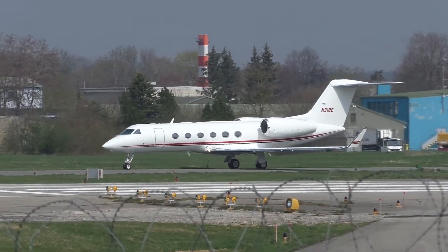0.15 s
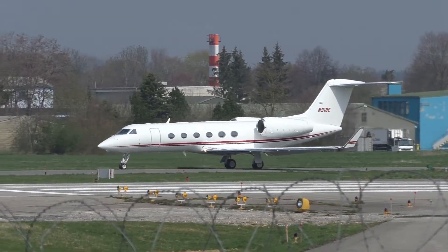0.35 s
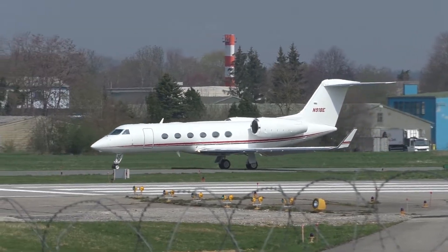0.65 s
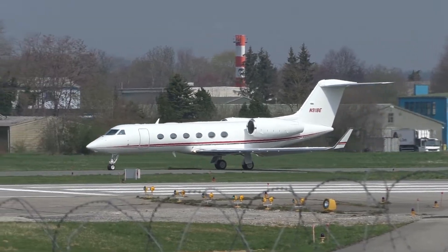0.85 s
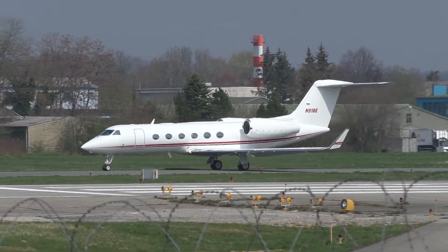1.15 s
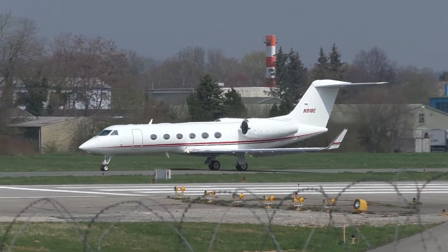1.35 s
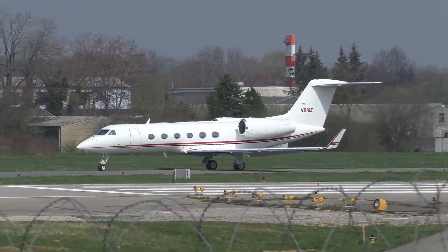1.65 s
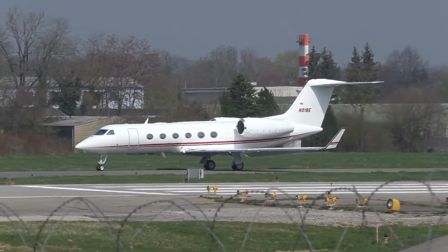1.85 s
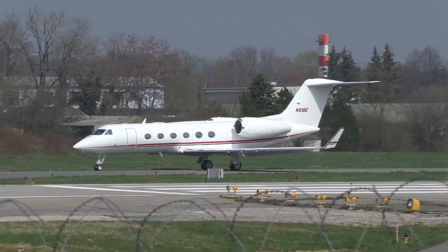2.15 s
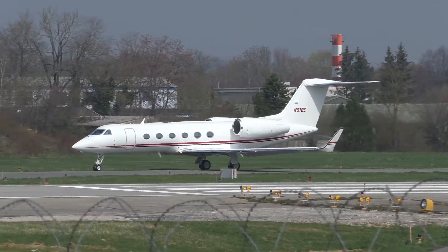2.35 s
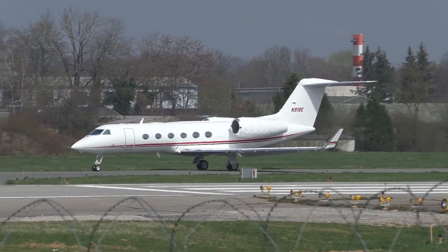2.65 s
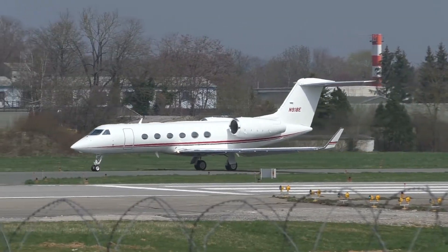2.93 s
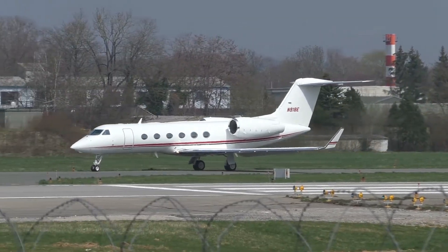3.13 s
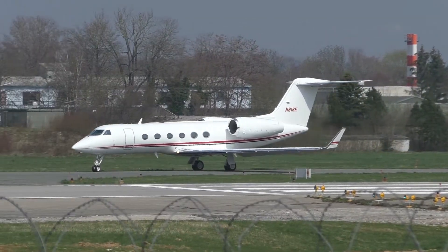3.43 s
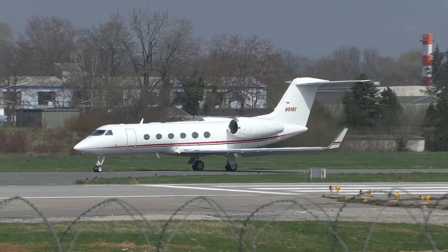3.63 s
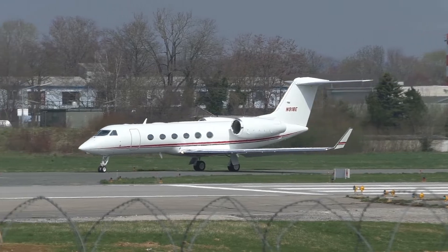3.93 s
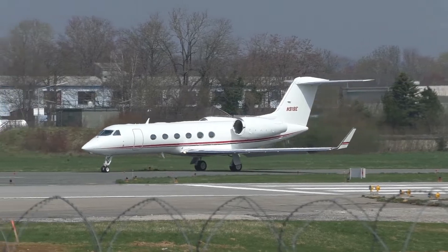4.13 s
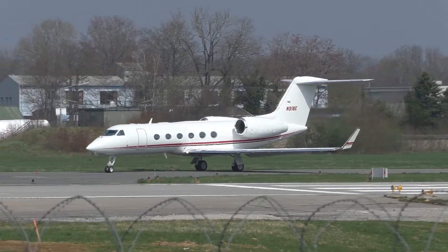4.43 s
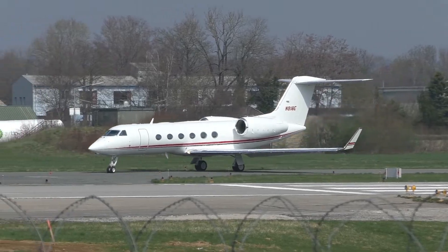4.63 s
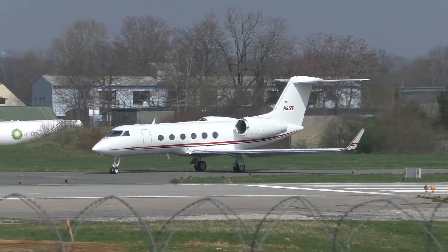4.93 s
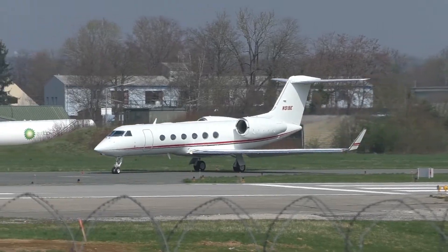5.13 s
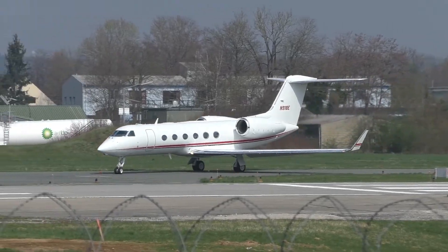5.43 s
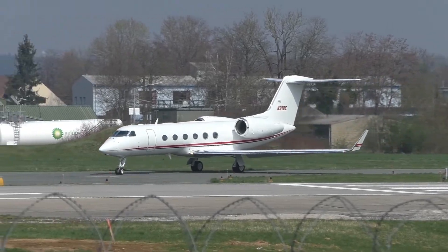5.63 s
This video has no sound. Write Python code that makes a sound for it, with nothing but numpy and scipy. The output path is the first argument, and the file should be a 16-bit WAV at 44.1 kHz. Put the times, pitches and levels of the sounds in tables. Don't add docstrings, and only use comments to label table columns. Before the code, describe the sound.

A distant twin-engine jet taxis by with a wavering whine over a dull roar, while wind thumps the microphone and a camera clicks three times.

```python
import sys
import numpy as np
from scipy import signal
from scipy.fft import rfft, irfft, next_fast_len
from scipy.io import wavfile
from scipy.ndimage import uniform_filter1d

SR = 44100
rng = np.random.default_rng(int(sys.argv[2]) if len(sys.argv) > 2 else 0)


def invert_db(level):
    return 10 ** (np.asarray(level, dtype=float) / 20)


def wav_record(signal):
    frames = np.transpose(np.atleast_2d(signal))
    bounded = np.clip(frames, -1, 1)
    quanta = np.round(bounded * 32767).astype(np.int16)
    wavfile.write(sys.argv[1], SR, quanta)


N = 255339
HOP = 40
LEFT_DB = -7.5


def control_time():
    return np.arange(N // HOP + 2) * HOP / SR


def spread(control):
    return np.interp(np.arange(N) / HOP, np.arange(len(control)), control)


def in_time(rows):
    s, *columns = np.transpose(rows)
    return [np.interp(control_time(), s, column) for column in columns]


def bells(s, half_s):
    centre_s, half_s = np.reshape(s, (-1, 1)), np.reshape(half_s, (-1, 1))
    return np.exp(-((control_time() - centre_s) / half_s) ** 2)


def rms_one(x):
    return x / np.sqrt(np.mean(x ** 2) + 1e-20)


def drift(rate_hz):
    r = np.exp(-2 * np.pi * rate_hz * HOP / SR)
    settle = 2000
    noise = rng.standard_normal(N // HOP + 2 + settle)
    return rms_one(signal.lfilter([1], [1, -2 * r, r * r], noise)[settle:])


def at_hz(points, hz):
    points = np.array(points)
    return np.interp(np.log(hz), np.log(points[:, 0]), points[:, 1])


def coloured(points, x=None):
    size = next_fast_len(N)
    hz = np.maximum(np.arange(size // 2 + 1) * SR / size, 0.1)
    x = rng.standard_normal(N) if x is None else x
    return rms_one(irfft(rfft(x, size) * invert_db(at_hz(points, hz)), size)[:N])


def resonance(x, hz, width_hz):
    r = np.exp(-np.pi * width_hz / SR)
    numerator = np.array([1, 0, -1]) * (1 - r * r) / 2
    return signal.lfilter(numerator, [1, -2 * r * np.cos(2 * np.pi * hz / SR), r * r], x)


def focus(hz, rows, half_s, octaves):
    s, centre_hz, gain_db = np.transpose(rows)[:3]
    nearness = np.exp(-(np.log2(hz / centre_hz) / octaves) ** 2)
    return gain_db * nearness @ bells(s, half_s)


def swell_db_at(hz):
    # t/s, f/Hz, gain/dB, half-length/s
    swells = [(0.091, 868, -4, 0.34), (0.097, 2580, -3.5, .15), (0.752, 2480, 5, 0.19),
              (1.53, 2500, 8, 0.078), (1.991, 1100, 1, 0.28), (2.6, 1800, -8, 0.16),
              (2.904, 395, 2.5, 0.064), (3.023, 1705, 5, 0.18), (3.029, 4540, 4.5, 0.079),
              (3.093, 91.3, 5.5, .25), (3.392, 1476, 2, 0.14), (4.003, 878, 2.5, 0.24),
              (3.85, 6030, -4, 0.34), (0.852, 3200, 2.5, .3), (2.4, 2500, -1.5, .08), (5.1, 331, 4, 0.36),
              (4.342, 1464, 2.5, 0.17), (5.325, 914, 4.5, 0.16), (5.476, 2006, 3, 0.058),
              (5.773, 300, 6.5, 0.025), (5.764, 3020, 6.5, 0.055)]
    return focus(hz, swells, np.array(swells)[:, 3], octaves=1)


def level_at(hz):
    # f/Hz, start level/dB, rise/(dB/s)
    roar_turn = np.array([(357, -45, -0.28), (1100, -41.5, 2), (2900, -37.5, 0.16), (4300, -55.5, 1.75)])
    # t/s, f/Hz, gain/dB, half-length/s
    patches = [(0.421, 1450, 4.5, .2), (0.452, 2600, 3, 0.12), (0.757, 520, 2.5, .1),
               (0.718, 3100, 4.5, 0.18), (.97, 3100, 4.5, 0.18), (0.965, 1050, 5.5, 0.21),
               (.95, 4300, 6, .1), (1.186, 1800, -3, .1), (1.346, 2900, 4, 0.14), (1.805, 4000, 8.5, 0.14),
               (1.938, 1350, 6, 0.18), (1.997, 2900, 3, 0.11), (2.307, 800, 2, 0.16),
               (2.25, 2300, -3.5, .12), (2.846, 2900, -4.5, 0.17), (3.154, 1000, 3.5, 0.19),
               (3.349, 3500, 6, .13), (3.65, 2700, -3, 0.17), (3.954, 3800, 1.5, .2), (4.05, 2000, 4.5, .2),
               (4.045, 700, 5, .1), (4.342, 2100, -0.5, 0.093), (4.459, 1450, 1, 0.11),
               (4.642, 2900, -2, 0.091), (4.802, 1000, 2, .12), (4.85, 700, 8, 0.13),
               (5.003, 4300, 5.5, 0.17), (5.2, 3000, 10, 0.29), (5.294, 700, 6, 0.15),
               (5.295, 500, 3.5, 0.19)]
    trend_db = at_hz(roar_turn[:, :2], hz) + at_hz(roar_turn[:, ::2], hz) * control_time()
    return trend_db + swell_db_at(hz) + focus(hz, patches, np.array(patches)[:, 3], octaves=0.27)


def roar(patchy_db):
    # f/Hz, density/dB
    roar_colour = [(70, -29.5), (115, -2.5), (210, -11), (420, -14), (700, -9.5), (1200, -8), (1900, -14.5),
                   (2600, -18.5), (3200, -18.5), (4200, -26.5), (5500, -37.5), (7000, -48.5), (8500, -54.5),
                   (12000, -62.5)]
    # f/Hz, width/Hz
    duct_peak = (722.5, 58)
    edges_hz = 80 * 2 ** np.arange(0, 7.7, 1 / 3)
    white = rng.standard_normal((2, N))
    jet = 0
    for k, (low, high) in enumerate(zip(edges_hz, edges_hz[1:])):
        band_filter = signal.butter(2, [low, high], "band", fs=SR, output="sos")
        band = signal.sosfilt(band_filter, white[k % 2])
        swell_db = level_at(np.clip(np.sqrt(low * high), 200, 6500))
        own_db = patchy_db * (drift(2.77) + 0.5 * drift(5.8))
        jet = jet + band * spread(invert_db(swell_db - swell_db.mean() + own_db))
    howl = resonance(rng.standard_normal(N), *duct_peak)
    howl = rms_one(resonance(howl, *duct_peak))
    return invert_db(-33) * coloured(roar_colour, jet) + howl * spread(invert_db(level_at(duct_peak[0]) - 5.5))


def tone(hz, level_db, flicker_db, wander):
    phase = 2 * np.pi * (np.cumsum(hz) * HOP / SR + rng.random())
    phase = phase + wander * (drift(5.7) + 0.44 * drift(46))
    level = invert_db(level_db + flicker_db * drift(14.2))
    return np.sqrt(2) * spread(level) * np.sin(spread(phase))


def whine():
    # t/s, fan blade f/Hz, compressor base f/Hz
    spool_speed = [(0.0, 2069.9, 726.7), (0.4, 2068.6, 726.7), (0.8, 2069.4, 728.0), (1.2, 2070.1, 727.6),
                   (1.6, 2066.9, 725.0), (2.0, 2061.3, 722.7), (2.4, 2059.0, 722.1), (2.8, 2062.0, 722.3),
                   (3.2, 2064.2, 722.6), (3.6, 2058.9, 721.6), (4.0, 2051.4, 720.6), (4.4, 2048.4, 720.4),
                   (4.8, 2050.2, 721.7), (5.2, 2052.2, 722.1), (5.6, 2051.7, 721.9), (5.8, 2051.4, 721.7)]
    # t/s, level/dB
    blade_level = [(0, -54.5), (.4, -40), (.62, -45.5), (.85, -37), (1.05, -47.5), (1.6, -32.5),
                   (1.87, -44.5), (2.1, -39), (2.38, -56), (2.6, -44), (2.92, -50.5), (3.05, -33.5),
                   (3.5, -41.5), (4.0, -28.5), (4.52, -38.5), (4.82, -32), (5.25, -48), (5.79, -28)]
    fan_orders = [1, 1.0475, 1.142, 1.571]
    # start level/dB, rise/(dB/s)
    sum_tones = [(-53, 0.54), (-59.5, 1.5), (-54.5, 0.9)]
    # start level/dB, rise/(dB/s)
    core_orders = [(-69.5, 1.7), (-66.5, 1.2), (-73, 1.6)]
    # t/s, f/Hz, gain/dB
    fan_flares = [(.75, 2166, 15.5), (1.25, 2166, 10), (1.42, 2166, 9), (1.6, 2166, 11), (1.88, 2160, 7.5),
                  (3.1, 2160, 4.5), (4.0, 2150, 12.5), (4.33, 2146, 21), (4.92, 2148, 9), (5.15, 2150, 3),
                  (.45, 2362, 10), (.72, 2362, 7), (1.55, 2360, 7), (1.9, 2355, 6.5), (3.03, 2355, 9),
                  (4.0, 2343, 11.5), (4.55, 2340, 9.5), (4.8, 2340, 8), (5.45, 2343, 7), (5.72, 2343, 10.5),
                  (0.721, 3250, 13.5), (1.0, 3250, 10), (1.55, 3245, 6.5), (2.1, 3240, 5.5),
                  (3.38, 3240, 10.5), (3.75, 3230, 5.5), (4.5, 3220, 2.5), (5.18, 3224, 12.5),
                  (5.35, 3224, 5), (5.75, 3224, 9.5)]
    # t/s, f/Hz, gain/dB
    core_flares = [(.5, 4360, 4), (.68, 4365, 7), (1.54, 4350, 6), (1.78, 4345, 11), (1.98, 4335, 5),
                   (2.97, 4333, 9), (3.35, 4333, 7), (4.42, 4322, 8), (4.76, 4328, 4), (.22, 5087, 3),
                   (.66, 5117, 10.5), (1.63, 5070, 10), (2.0, 5060, 6), (3.38, 5055, 8), (3.94, 5070, 9),
                   (4.38, 5043, 9), (4.75, 5090, 6.5), (5.0, 5054, 8.5), (5.5, 5054, 10.5), (.66, 5830, 8),
                   (.99, 5830, 7), (1.55, 5800, 13), (1.75, 5795, 6.5), (3.0, 5780, 8), (3.18, 5780, 8),
                   (3.38, 5778, 11), (4.29, 5780, 11.5), (4.65, 5806, 12), (4.98, 5775, 13),
                   (5.45, 5775, 7)]
    weak_orders = [.1228, .246, 1.2225, 1.3615, 1.492, 1.540, 1.921, 2]
    weak_db = [-14, -27.5, -29, -26, -19, -26.5, -17.5, -24]
    # multiple, level against the roar/dB
    core_weak = [(2, -25), (9, -30.5)]

    t = control_time()
    fan_hz, core_hz = (uniform_filter1d(hz, size=SR // 160) for hz in in_time(spool_speed))
    hum_hz = 92.3
    hum_db = -34 - 0.5 * t + swell_db_at(hum_hz)
    out = tone(np.full(len(t), hum_hz), hum_db, flicker_db=1.36, wander=0.27)
    out += tone(fan_hz, in_time(blade_level)[0], flicker_db=1.5, wander=0.53)

    for multiple, (start_db, rise) in zip(fan_orders[1:], sum_tones):
        hz = multiple * fan_hz
        level_db = start_db + rise * t + focus(hz.mean(), fan_flares, half_s=0.13, octaves=0.017)
        out += tone(hz, level_db, flicker_db=2.0, wander=0.59)

    for order, (start_db, rise) in enumerate(core_orders, start=6):
        hz = order * core_hz
        flare_db = focus(hz.mean(), core_flares, half_s=0.1, octaves=0.017)
        level_db = start_db + rise * t + flare_db + 1.6 * drift(7.7)
        out += tone(hz, level_db, flicker_db=2.2, wander=0.48)
        out += tone(hz * 1.0006, level_db - 4.0, flicker_db=2.5, wander=0.67)

    weak = [(multiple * fan_hz, db) for multiple, db in zip(weak_orders, weak_db)]
    weak += [(multiple * core_hz, db) for multiple, db in core_weak]
    for hz, over_db in weak:
        level_db = level_at(hz.mean()) + over_db + 3.9 * drift(0.8)
        out += tone(hz, level_db, flicker_db=4.5, wander=0.7)
    return out


def wind():
    # t/s, thump level/dB, buffet level/dB, half-length/s
    gusts = [(0.007, -28, -21, 0.032), (0.13, -11, -25.5, 0.077), (.25, -15, -23, 0.1),
             (0.463, -15, -24, .08), (0.831, -12, -21.5, 0.15), (1.007, -14, -17.5, 0.05),
             (1.153, -13.5, -18.5, 0.04), (1.3, -12, -27, .06), (1.562, -15, -26, 0.15),
             (2.042, -10, -22, 0.07), (2.195, -13, -22, 0.1), (2.397, -11, -17.5, 0.1),
             (2.6, -15, -23, 0.081), (3.212, -21, -25, 0.1), (3.508, -6.5, -23, .1),
             (3.648, -9.5, -22, 0.052), (3.918, -22, -21.5, .06), (4.081, -20, -20.5, .05),
             (4.195, -12, -30, 0.12), (4.372, -16.5, -20.5, 0.044), (4.541, -12, -33, .06),
             (4.99, -19, -29, .04), (5.405, -12, -18.5, 0.049), (5.63, -10, -36, 0.17)]
    # thump level/dB, buffet level/dB
    lulls_db = (-21, -28)
    # f/Hz, density/dB
    thump_colour = [(2, -0.5), (5, 16), (12, 17), (20, 9.5), (28, -1.5), (45, -52.5), (400, -160)]
    # f/Hz, density/dB
    buffet_colour = [(15, -14), (26, 3.5), (45, -8.5), (70, -12), (120, -21), (180, -42.5), (300, -75.5),
                     (2000, -150)]
    s, *gust_db, half_s = np.transpose(gusts)
    out = 0
    for level_db, lull_db, colour in zip(gust_db, lulls_db, (thump_colour, buffet_colour)):
        air = coloured(colour)
        gust_power = invert_db(level_db) ** 2 @ bells(s, half_s) ** 2
        strength = spread(np.sqrt(gust_power + invert_db(lull_db) ** 2))
        evened = air / np.sqrt(uniform_filter1d(air ** 2, size=SR // 8) + 0.15)
        out = out + strength * evened
    return out


def shutter():
    # t/s, level/dB
    shots = [
        (0.6629, 1.5),
        (2.319, -2),
        (2.599, -2.5),
    ]
    # delay/s, peak level/dB, ring f/Hz
    contacts = [(0, -46, 6900), (.007, -37, 6480), (.0135, -42.5, 6500), (.0248, -36.5, 6980),
                (.032, -44.5, 6790), (.05, -34, 6070), (.084, -37, 6680), (.088, -38, 6500)]
    # t/s, peak level/dB, ring f/Hz
    stray_ticks = [(.369, -53.5, 6070), (0.7354, -47, 7300), (1.888, -52.5, 6500), (2.031, -57, 7040),
                   (2.466, -70, 7000)]
    # f/Hz, level/dB, t60/s
    body_modes = [(7600, -1, 0.0045), (9050, -11.5, 0.0047), (11000, -11.5, 0.0021), (12700, -11.5, .003),
                  (14300, -13.5, .003)]

    hits = [(s + delay, db + shot_db, hz) for s, shot_db in shots for delay, db, hz in contacts]
    hits += stray_ticks
    out, t = np.zeros(N), np.arange(SR // 25) / SR
    for s, peak_db, ring_hz in hits:
        scratch = rng.standard_normal(len(t)) * np.exp(-t / 0.0019)
        body = sum(invert_db(db) * resonance(scratch, hz, 2.4 / t60) for hz, db, t60 in body_modes)
        hit = invert_db(10.5) * resonance(scratch, ring_hz, 450) + body
        at = round(s * SR)
        out[at:at + len(t)] += invert_db(peak_db + 2.0) * hit / np.abs(hit).max()

    noise = rng.standard_normal(N)
    whirr = invert_db(4.0) * resonance(noise, 7100, 1200)
    whirr = rms_one(whirr + sum(invert_db(db) * resonance(noise, hz, 1200) for hz, db, _ in body_modes))
    time_s, winding_s = np.arange(N) / SR, 0.095
    ramp_s = [0, 0.01, winding_s, winding_s + 0.012]
    turning = invert_db(-64) * sum(np.interp(time_s - s, ramp_s, [0, 1, 1, 0]) for s, _ in shots)
    gears = whirr * turning * spread(invert_db(3.3 * drift(150)))
    small_parts = signal.butter(4, [5600, 15000], "band", fs=SR, output="sos")
    return signal.sosfilt(small_parts, out + gears)


def ducking():
    # t/s, depth/dB, hold/s
    ducks = [(0.792, 2.5, 0.015), (2.417, 5.5, 0.064), (3.519, 7.5, 0.044), (3.642, 3.5, 0.018),
             (4.164, 5.5, 0.039)]
    attack_s, release_s = 0.015, 0.056
    t = np.arange(N) / SR
    depth_db = np.zeros(N)
    for s, db, hold_s in ducks:
        corners_s = np.cumsum([-attack_s, attack_s, hold_s, release_s])
        depth_db += np.interp(t - s, corners_s, [0, db, db, 0])
    return invert_db(-depth_db)


def scene():
    aircraft = (roar(patchy_db=1.27) + whine()) * ducking()
    air = aircraft + wind() + shutter()
    gains = invert_db(np.array([LEFT_DB, 0]))
    return air * (gains / gains.mean())[:, None]


def top_cut(x):
    return signal.sosfilt(signal.butter(12, 15800, fs=SR, output="sos"), x)


def record(dry):
    # f/Hz, density/dB
    hiss_colour = [(3000, -32.5), (8000, 0.5), (10300, -13), (11500, 1), (14000, -5.5), (16000, -8.5)]
    balance = invert_db(np.array([[LEFT_DB / 2], [-LEFT_DB / 2]]))
    shared = invert_db(-89) * coloured(hiss_colour) * balance
    own = invert_db(-95) * rng.standard_normal(dry.shape)
    mix = 1.09 * np.tanh((dry + shared + own) / 0.9)
    return top_cut(mix)


dry = scene()
out = record(dry)
wav_record(out)
```